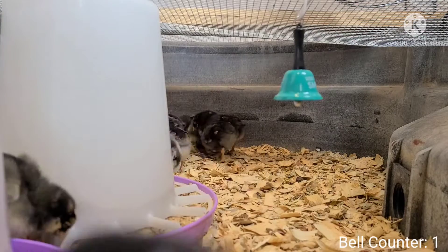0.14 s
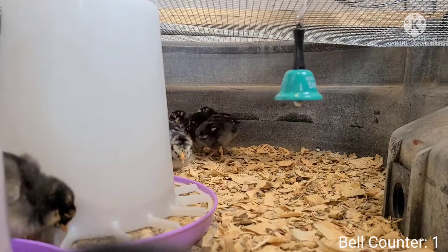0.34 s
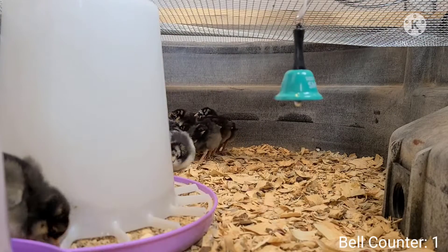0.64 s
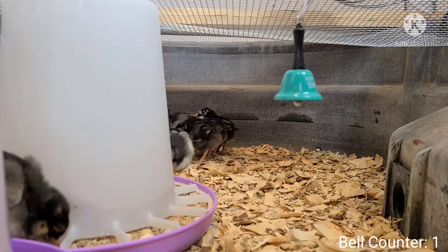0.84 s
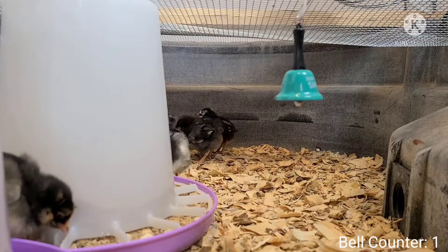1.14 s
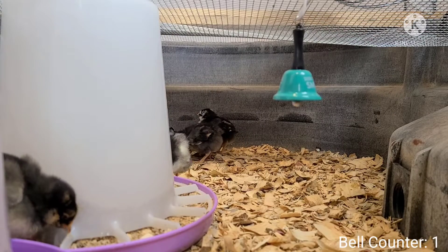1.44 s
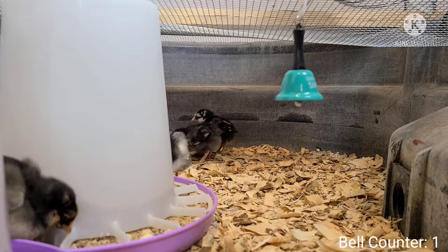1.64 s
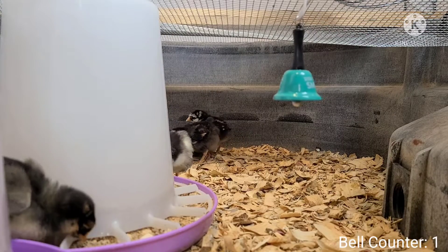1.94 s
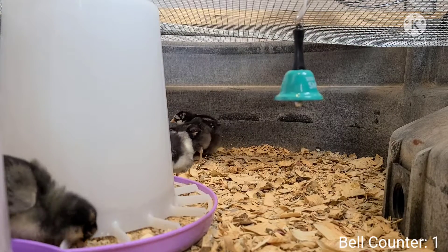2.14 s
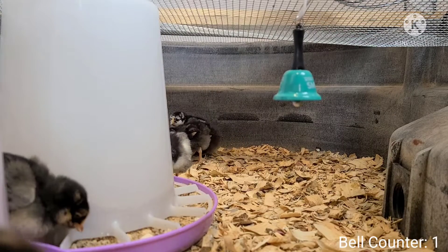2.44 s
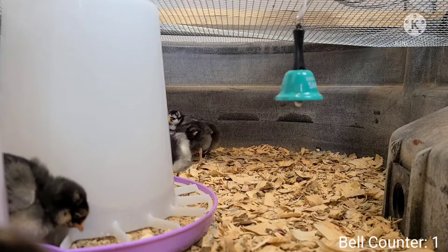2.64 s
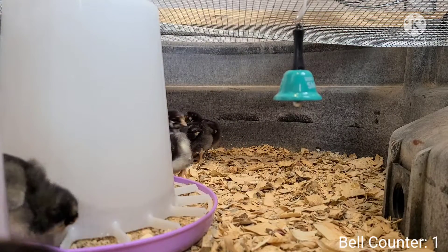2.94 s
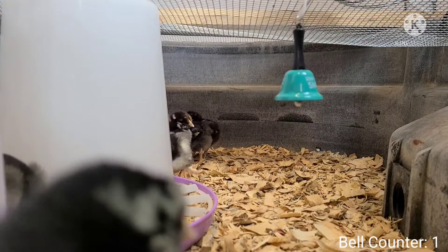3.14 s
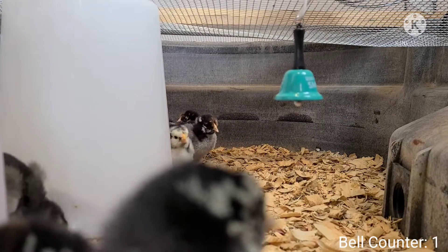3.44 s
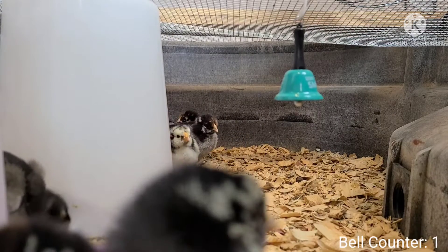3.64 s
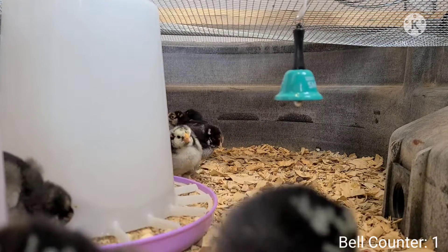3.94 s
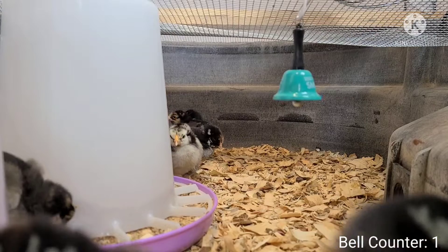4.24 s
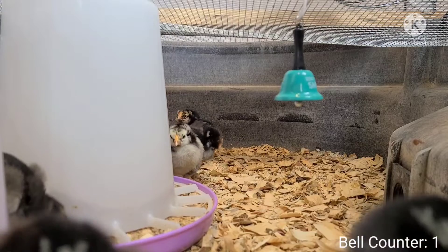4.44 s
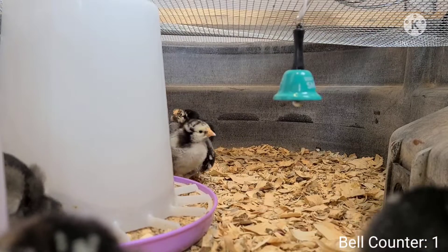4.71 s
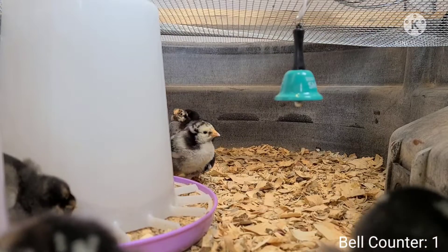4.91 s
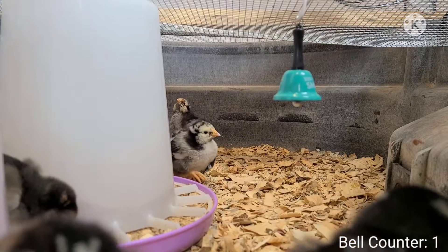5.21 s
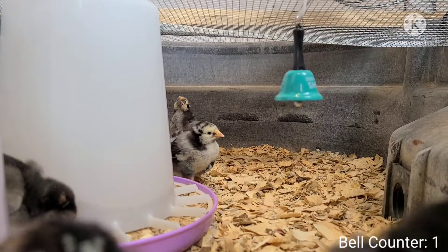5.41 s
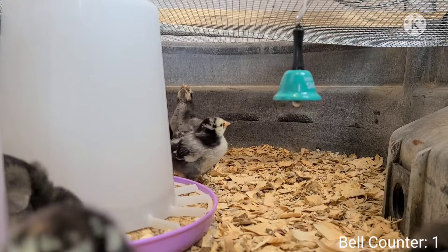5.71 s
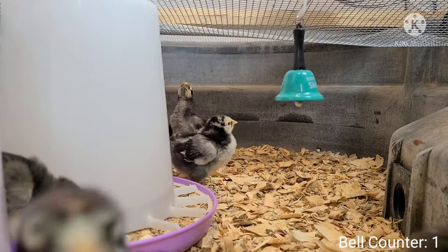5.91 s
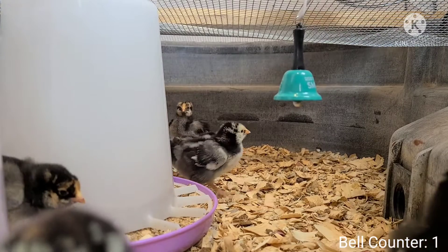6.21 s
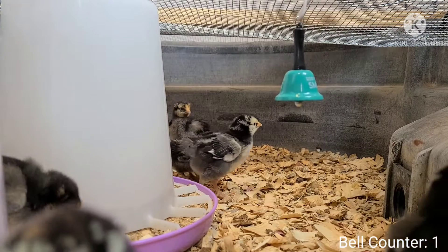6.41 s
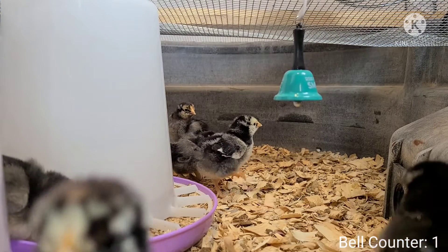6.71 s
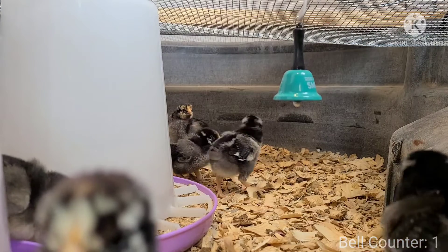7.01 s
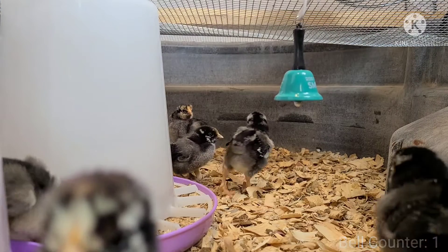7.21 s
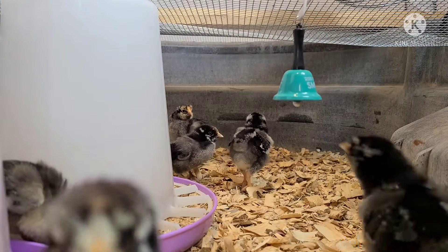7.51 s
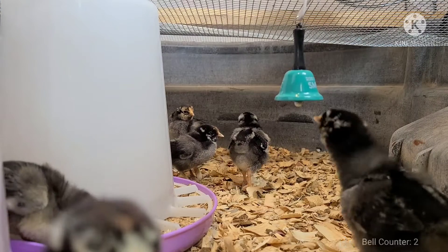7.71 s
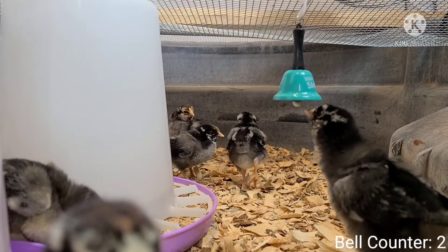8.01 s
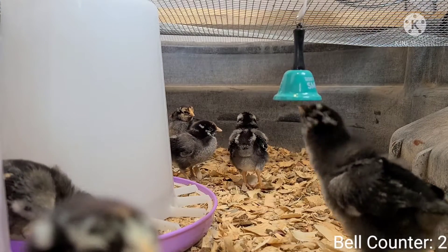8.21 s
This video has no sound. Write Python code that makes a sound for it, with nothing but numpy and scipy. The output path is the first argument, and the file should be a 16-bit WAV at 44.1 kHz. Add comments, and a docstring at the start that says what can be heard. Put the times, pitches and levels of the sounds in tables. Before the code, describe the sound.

Inside a small wooden brooder, close to the microphones, young chicks peep in short sliding whistles, thickest at first and then sparser. Their feet thump the hollow floor and scratch in wood shavings, with plasticky pecks at a feeder. It opens with a loud beak knock on the left. Late on, a heavy thumping scuffle showers crisp shavings, a smaller one follows, then lighter snaps lead to one short metallic bell strike. Quiet room air underneath.

```python
"""A beak pecks close to the left microphone while young chicks peep in a boxed brooder; whistled glides make the peeps.
Hops boom on the floor as struck modes, and filtered grains and short knocks make the shavings rustle and snap.
A trill swings through a throat resonance at 2.4 s, and nearer peeps follow from 4.9 s.
Two scuffles shower shavings about near 6 and 7 s; just before the end a chick rings a small hanging bell.
Dull reflections of the box surround the calls and knocks, and steady room air lies under everything."""
import sys
import numpy as np
from scipy import signal
from scipy.io import wavfile
from scipy.ndimage import uniform_filter1d

SR = 44100
rng = np.random.default_rng(int(sys.argv[2]) if len(sys.argv) > 2 else 0)


def to_wav(sig):
    """Store sig (one row per channel, or 1-D mono) as 16-bit WAV at the path in sys.argv[1].

    Samples outside -1..1 are clipped; the rate is SR.
    """
    pcm = np.clip(np.atleast_2d(sig), -1, 1) * 32767
    pcm = np.round(pcm).astype(np.int16)
    wavfile.write(sys.argv[1], SR, pcm.T)  # frames by channels


N = 368235

NEAR_DB, FAR_DB_PER_DB = -30, .62   # reference level of a near call [dB]; echo added per dB below it
LAG_S_PER_DB = .0001   # a sound louder on one side also arrives there first
OVERTONE_DB = -40
PEEP_ROUNDING, FLUTTER_PER_S = .25, 220   # share of the length that rounds the glide; speed of the wavering
PEEP_DB_PER_KHZ = -4   # within a peep the high part is fainter
# Near peeps swell more sharply: (level [dB], power of the arch)
FAR_SWELL = (-48, .6)
NEAR_SWELL = (-33, 1.2)
# Gliding calls: (time [s], length [s], start pitch [Hz], turn pitch [Hz], end pitch [Hz],
# turn [share of length], loudest point [share of length], nominal envelope level [dB], left-right [dB])
PEEP_CALLS = [(.028,.04,3200,4800,3000,.55,.6,-54,4),(.056,.03,4700,4400,3600,.5,.3,-54,3),(.056,.06,3100,2950,2880,.5,.4,-50,2),(.06,.045,3900,3500,3200,.5,.4,-53,2),(.159,.046,3150,3800,2700,.45,.6,-49,2),
              (.172,.016,4050,4240,4050,.4,.4,-63,1),(.458,.05,3700,4850,3900,.5,.5,-56,2),(.498,.038,3450,3250,3650,.4,.35,-54,2),
              (.548,.1,3250,3500,2900,.2,.4,-50,0),(.67,.04,3450,4050,2850,.45,.7,-51,-2),(.678,.016,4550,4620,4500,.5,.5,-60,1),
              (.74,.042,3600,3350,3000,.5,.5,-54,6),(.797,.038,3700,4400,2700,.5,.8,-50,2),(.835,.08,2900,3450,3050,.28,.4,-52,1),
              (1.013,.065,3800,4400,3000,.3,.55,-59,5),(1.17,.057,3350,3950,3000,.7,.6,-54,-2),(1.195,.02,4400,4800,4800,.6,.6,-60,1),
              (1.227,.078,3050,3700,4100,.3,.3,-59,0),(1.268,.016,3450,3390,3300,.5,.4,-54,1),(1.272,.026,4750,4900,4700,.4,.5,-62,5),
              (1.308,.02,2720,2680,2640,.5,.4,-56,-1),(1.405,.045,4500,3700,2600,.5,.8,-51,-1),(1.418,.04,3350,3150,2650,.5,.5,-55,-1),(2.826,.02,3300,2900,2650,.5,.6,-53,2),
              (1.994,.07,4000,4150,2650,.15,.5,-50,-1),(2.16,.068,4500,3550,3200,.5,.6,-53,5),(2.372,.065,3400,3550,3250,.3,.4,-50,3),
              (2.572,.04,3050,3100,2950,.3,.4,-55,2),(2.664,.05,3350,3700,2800,.5,.4,-49,1),(2.788,.04,3300,4350,2700,.55,.6,-54,2),
              (2.8,.018,4900,4900,4700,.4,.4,-60,1),(3.075,.055,3550,3450,2900,.3,.6,-47,1),
              (3.24,.04,4350,3900,3600,.4,.2,-60,4),(3.285,.025,3500,3300,3100,.5,.6,-50,4),(3.516,.042,3300,3200,2750,.4,.7,-56,4),
              (3.653,.055,3650,3330,2800,.45,.35,-51,6),(4.186,.074,2950,2720,2620,.35,.35,-52,6),(4.418,.055,3450,3400,3150,.4,.55,-57,5),
              (4.486,.044,3000,2780,2700,.5,.6,-56,4),(4.933,.058,3750,3230,2800,.5,.5,-31,-5),(5.489,.031,3700,3200,2800,.45,.45,-33,2),
              (5.657,.052,3800,3150,2860,.4,.6,-31,-8),(6.972,.052,3950,3200,2950,.6,.5,-29,2)]


def peeps():
    """Each syrinx whistle glides to a turn and on, its level wavering; returns the calls and their echo feed."""
    out, echoed = np.zeros((2, 2, N))
    wavers = rng.standard_normal((len(PEEP_CALLS), 2, 60))
    for call, waver in zip(PEEP_CALLS, wavers):
        s, length, start_hz, turn_hz, end_hz, turn, loudest, level_db, pan_db = call
        u = np.linspace(0, 1, round(length * SR))
        pitch = np.interp(u, [0, np.clip(turn, .05, .95), 1], [start_hz, turn_hz, end_hz])
        pitch = uniform_filter1d(pitch, size=round(PEEP_ROUNDING * len(u)) + 1, mode="nearest")
        wobble, flutter = (np.interp(u * length * FLUTTER_PER_S, np.arange(len(w)), w) for w in waver)
        # faint, far voices are more ragged in pitch and level
        pitch *= 1 + .0007 * (NEAR_DB - level_db) * wobble
        skew = np.log(.5) / np.log(np.clip(loudest, .15, .9))
        sharpness = np.interp(level_db, *np.transpose([FAR_SWELL, NEAR_SWELL]))
        swell = rms_one(np.sin(np.pi * u ** skew) ** sharpness)
        tilt_db = PEEP_DB_PER_KHZ * (pitch - pitch.mean()) / 1000
        flutter_db = .17 * (NEAR_DB + 4 - level_db) * flutter
        peep = whistle(pitch, swell * from_db(level_db + tilt_db + flutter_db))
        add(out, s, peep, pan_db)
        add(echoed, s, from_db(FAR_DB_PER_DB * (NEAR_DB - level_db)) * peep, 0)   # faint = far = wetter
    return out, echoed[0]


THROAT_HZ, THROAT_WIDTH_HZ, THROAT_DB = 3330, 250, 16
# Extent of the trill: (start [s], end [s], lowest pitch [Hz])
TRILL_EXTENT = (2.441, 2.572, 2500)
# Swings of the trill: (time of the top [s], top pitch [Hz], level before the throat lift [dB])
TRILL_SWINGS = [(2.43, 3000, -50), (2.4625, 3620, -45), (2.494, 4150, -48), (2.5265, 3680, -47),
                (2.556, 3400, -49), (2.586, 3300, -52)]


def trill():
    """A whistle swings up and down and gains level at the throat resonance; returns call and echo feed."""
    out, echoed = np.zeros((2, 2, N))
    start, end, low_hz = TRILL_EXTENT
    t = np.arange(start, end, 1 / SR)
    top_s, top_hz, top_db = np.transpose(TRILL_SWINGS)
    swing = np.interp(t, top_s, np.arange(len(top_s)))
    nearest_top_hz = top_hz[np.round(swing).astype(int)]
    pitch = low_hz + (nearest_top_hz - low_hz) * np.abs(np.cos(np.pi * swing)) ** 2.3
    lift_db = THROAT_DB * np.exp(-((pitch - THROAT_HZ) / THROAT_WIDTH_HZ) ** 2)
    fade = np.sin(np.linspace(0, np.pi, len(t))) ** .25
    call = whistle(pitch, from_db(np.interp(t, top_s, top_db) + lift_db) * fade)
    add(out, start, call, -.7)
    add(echoed, start, from_db(13.5) * call, 0)
    return out, echoed[0]


def whistle(hz, envelope):
    """A nearly pure tone with a faint octave."""
    phase = 2 * np.pi * np.cumsum(hz) / SR
    return envelope * (np.sin(phase) + from_db(OVERTONE_DB) * np.sin(2 * phase))


SHUFFLE_DB, SHUFFLE_T60_S, SHUFFLE_ATTACK_S = -10, .6, .012   # level under the thump; t60 before damping
# Modes far from the struck pitch ring less and later; a foot pushes softly
FOCUS_DB_PER_OCTAVE, PUSH_CYCLES, SCATTER_S = -5, .45, .02   # SCATTER_S is the delay per octave
# Above CROSS_HZ the floor also rings crosswise, opposed in the two microphones
CROSS_DB, CROSS_HZ, CROSS_LAG_S = -3, 400, .0016
# Low and upper modes of the box floor: (pitch [Hz], relative level [dB], free t60 [s])
BOOM_MODES = [(45, -18, .3), (82, 0, .45), (100, 1, .35), (124, -1, .3), (145, -3, .5)]
UPPER_MODES = [(230, 2, .35), (250, -2, .3), (280, -4, .25), (345, -6, .2), (393, -3, .22), (513, -7, .18),
               (610, -11, .15)]
# General bustle of the flock, nominal levels: (time [s], boom [dB], upper floor modes [dB],
# scuff [dB], crackle floor [dB], left-right of scuff and crackle [dB]); the shavings play it too
FLOCK_BUSTLE = [(0.0, -60, -59, -68, -78, 2.0), (1.81, -52, -55, -65, -76, -3.0),
                (2.39, -61, -63, -68, -78, 0.5), (2.84, -53, -57, -65, -74, 0.0),
                (3.9, -55, -61, -69, -77, -1.0), (4.49, -61, -61, -65, -75, 1.0),
                (4.91, -48, -52, -63, -76, -3.5), (5.77, -58, -58, -66, -76, -3.5),
                (6.02, -54, -54, -60, -71, -0.5), (6.16, -43, -56, -65, -74, -1.5),
                (6.33, -52, -62, -70, -79, -2.0), (6.72, -59, -60, -69, -81, -0.5),
                (7.14, -46, -53, -61, -78, -1.0), (7.49, -57, -63, -65, -74, 0.0),
                (8.19, -64, -66, -70, -77, -2.5), (8.35, -63, -67, -64, -73, 9.0)]
# Hops and landings, the first row being the heavily damped blow of the beak's peck: (time [s], nominal peak
# [dB], upper modes over the boom [dB], struck boom pitch [Hz], # struck upper pitch [Hz], damping [share of the
# free t60])
FLOOR_THUMPS = [(0.048, -36, -6, 130, 400, 0.12), (0.229, -44, -13, 64.6, 277, 0.6),
                (0.309, -52, 2, 94.2, 382, 0.6), (0.526, -45, -8, 83.4, 221, 0.6),
                (0.724, -47, -1, 61.9, 245, 0.6), (0.824, -46, -6, 91.5, 213, 0.6),
                (0.939, -47, -1, 70.0, 261, 0.6), (0.976, -37, -7, 75.4, 213, 0.6),
                (1.052, -33, -12, 105, 213, 0.6), (1.284, -41, -10, 78.1, 240, 0.6),
                (1.517, -27, -11, 132, 300, 0.6), (1.598, -33, -9, 116, 215, 0.6),
                (1.664, -40, 4, 96.9, 345, 0.6), (1.859, -44, -2, 105, 439, 0.6),
                (2.065, -43, -5, 129, 213, 0.6), (2.262, -43, -9, 78.1, 213, 0.6),
                (2.548, -47, -1, 121, 541, 0.6), (2.709, -46, -1, 91.5, 237, 0.6),
                (2.796, -34, -14, 94.2, 229, 0.6), (2.92, -30, -13, 105, 234, 0.6),
                (3.549, -37, -10, 80.7, 223, 0.6), (3.598, -45, 1, 132, 234, 0.6),
                (3.873, -43, -11, 102, 218, 0.6), (4.017, -43, -9, 99.6, 240, 0.6),
                (4.468, -49, 10, 143, 213, 0.6), (4.608, -48, 2, 102, 299, 0.6),
                (4.717, -38, -1, 143, 213, 0.6), (4.746, -24, -9, 108, 330, 0.6),
                (4.938, -43, 2, 135, 310, 0.6), (5.076, -34, -16, 96.9, 261, 0.6),
                (5.228, -44, 2, 80.7, 328, 0.6), (5.357, -37, -6, 83.4, 213, 0.6),
                (5.985, -20, -9, 94.2, 226, 0.6), (6.037, -20, -7, 88.8, 229, 0.6),
                (6.098, -27, 1, 140, 231, 0.6), (6.724, -44, -5, 105, 215, 0.6),
                (6.829, -44, -5, 124, 213, 0.6), (6.987, -33, -7, 105, 237, 0.6),
                (7.029, -30, -12, 86.1, 213, 0.6), (7.203, -35, -7, 91.5, 226, 0.6),
                (7.447, -42, -11, 78.1, 237, 0.6), (8.276, -49, -1, 67.3, 256, 0.6),
                (8.303, -54, 6, 100, 400, 0.5), (6.012, -34, 2, 120, 480, 0.5),
                (6.062, -30, 3, 120, 520, 0.6), (7.24, -44, 2, 100, 400, 0.5)]


def floor_boards():
    """Soft footfalls keep the floor modes going; thumps favour modes near their pitch and a shuffle follows."""
    boom_db, upper_db = in_time(FLOCK_BUSTLE)[:2]
    s, thump_db, over_db, boom_hz, upper_hz, damping = np.transpose(FLOOR_THUMPS)
    out, click = 0, np.eye(1, SR // 2)[0]
    groups = ((BOOM_MODES, boom_db, thump_db - .7, boom_hz),
              (UPPER_MODES, upper_db, thump_db + over_db + 1.5, upper_hz))
    for modes, bustle_db, hit_db, hit_hz in groups:
        steps = grains(per_s=150, spread_db=4)
        # standing feet halve the free ringing time
        patter = sum(from_db(db) * ring(steps[k % 2], hz, .5 * t60) for k, (hz, db, t60) in enumerate(modes))
        shuffle = bursts(bustle_db, s, hit_db + SHUFFLE_DB, SHUFFLE_T60_S * damping, SHUFFLE_ATTACK_S)
        out = out + shuffle * rms_one(patter)
        detunings = rng.normal(1, .02, (len(s), len(modes)))
        for at, level_db, struck_hz, share, detune in zip(s, hit_db, hit_hz, damping, detunings):
            push = np.hanning(round(PUSH_CYCLES * SR / struck_hz))[::4]
            push = push / push.sum()
            for (hz, db, t60), off in zip(modes, detune):
                octaves = abs(np.log2(hz / struck_hz))
                ringing = ring(click, hz * off, max(share, .1) * t60)
                blow = np.convolve(ringing[::4], push).repeat(4)   # coarse steps, smoothed by the filter below
                i = round((at + SCATTER_S * octaves) * SR)
                gain = from_db(level_db + db + FOCUS_DB_PER_OCTAVE * octaves)
                out[i:i + len(blow)] += gain * blow[:N - i]
    out = filtered(out, 3, [50, 1500], "band")
    cross = from_db(CROSS_DB) * np.roll(filtered(out, 4, CROSS_HZ, "high"), round(CROSS_LAG_S * SR))
    later = np.roll(out, round(.00025 * SR))   # the right side hears it later
    return np.stack([from_db(-.4) * out + cross, from_db(.4) * later - cross])


FEEDER_RUB_DB = -4   # how much of the scuff rings in the feeder
TRICKLE_DB, TRICKLE_PER_S = 3.5, 9   # the crackle swells at random over its floor
CRACKLE_LEVEL_HZ = 5000   # crackle levels count the treble above this
# The harder the kick, the faster it starts: (crackle level [dB], attack [s])
HARD_KICK = (-35, .004)
SOFT_KICK = (-60, .014)
# The higher the crackle, the sooner it dies: (upper edge [Hz], length [share of the kick's t60])
CRACKLE_FADES = [(4500, 1.15), (9500, .95), (20000, .72)]
# Spectra of dry shavings and of duller feet: (frequency [Hz], relative density [dB per Hz])
CRACKLE_SPECTRUM = [(880, -36), (1500, -6), (2020, -1), (2300, -6), (3730, -5), (5280, -9), (8740, -5),
                    (12200, -12), (15400, -15), (16000, -47)]
SCUFF_SPECTRUM = [(250, -16), (500, -2), (900, -2), (1400, 1), (2000, -3), (3000, -10), (5000, -30)]
# Modes of the plastic feeder, also knocked and scraped below: (pitch [Hz], relative level [dB], base t60 [s])
FEEDER_MODES = [(620, -4, .02), (1035, 0, .025), (1340, 2, .03), (1560, 0, .025), (1810, -2, .02),
                (2300, -3, .012)]
# Kicks in the shavings, nominal levels: (time [s], dull scuff [dB], bright crackle [dB], base t60 [s],
# left-right [dB])
SHAVING_KICKS = [(.38, -55, -66, .25, -1), (.745, -55, -64, .5, -1), (1.19, -58, -64, .3, 2),
                 (1.36, -54, -75, .3, -2), (1.89, -56, -72, .2, -2), (2.11, -57, -72, .25, -1),
                 (2.38, -56, -64, .4, 1), (2.543, -49, -66, .25, 0), (2.935, -58, -66, .2, 2),
                 (2.99, -58, -66, .3, 0), (3.2, -57, -66, .5, 0), (3.29, -52, -60, .4, 1),
                 (3.8, -58, -64, .25, -3), (4.05, -60, -66, .3, 0), (4.09, -50, -55, .2, -4),
                 (4.33, -58, -66, .3, -1), (4.545, -56, -66, .3, 0), (4.6, -54, -72, .2, -1),
                 (4.73, -44, -66, .3, -3), (4.84, -60, -68, .4, -2), (4.925, -45, -64, .25, -5),
                 (5.075, -57, -72, .2, -3), (5.217, -48, -59, .3, -4), (5.455, -53, -70, .25, 1),
                 (5.74, -52, -63, .5, -4), (5.998, -39, -70, .25, 1), (6.043, -31, -25, .29, 1),
                 (6.205, -46, -54, .1, -1), (6.55, -58, -68, .3, 0), (6.83, -54, -64, .35, -2),
                 (6.94, -50, -62, .2, 1), (6.966, -45, -34, .24, 2), (7.025, -45, -50, .3, -1),
                 (7.07, -48, -60, .25, -1), (7.19, -53, -75, .3, -2), (7.29, -58, -62, .5, -1),
                 (7.48, -58, -68, .25, 0), (7.6, -58, -63, .5, 0), (7.665, -54, -59, .2, 2),
                 (7.83, -55, -63, .3, 1), (8.15, -55, -63, .15, -4), (8.235, -54, -66, .2, -1),
                 (8.295, -56, -62, .2, -2)]


def shavings():
    """Dry grains in handfuls: a bright crackle and a duller scuff of feet that also rubs the feeder."""
    scuff_db, crackle_db, pan_db = in_time(FLOCK_BUSTLE)[2:]
    trickle = np.abs(wander(TRICKLE_PER_S))
    crackle_db = crackle_db + TRICKLE_DB * trickle
    s, kick_scuff_db, kick_crackle_db, t60, kick_pan_db = np.transpose(SHAVING_KICKS)
    attack_s = np.interp(kick_crackle_db, *np.transpose([SOFT_KICK, HARD_KICK]))

    def kicked(floor_db, kick_db, share):
        """Left and right gain of one layer, the kicks standing out of the bustle."""
        return np.stack([bursts(floor_db + side * pan_db, s, kick_db + side * kick_pan_db,
                                share * t60, attack_s) for side in (.5, -.5)])

    dull = kicked(scuff_db, kick_scuff_db, 1)
    bright = [kicked(crackle_db, kick_crackle_db, share) for hz, share in CRACKLE_FADES]

    crackle = colour(grains(7000, 3.5), [(700, -90)] + CRACKLE_SPECTRUM, patchy_db=2.2)
    crackle = crackle / filtered(crackle, 4, CRACKLE_LEVEL_HZ, "high").std()
    below = [0]
    for hz, share in CRACKLE_FADES:
        below.append(signal.sosfiltfilt(signal.butter(2, hz, fs=SR, output="sos"), crackle))
    crackle = sum(gain * (upper - lower) for gain, lower, upper in zip(bright, below, below[1:]))

    rubs = grains(900, 4)
    rubbed = rms_one(sum(from_db(db) * ring(rubs, hz, 1.6 * t60) for hz, db, t60 in FEEDER_MODES))
    feet = colour(grains(2500, 3.5), [(120, -90)] + SCUFF_SPECTRUM + [(8000, -90)], patchy_db=4)
    scuff = dull * (feet + from_db(FEEDER_RUB_DB) * rubbed)
    # a heavy shower is smoother than a trickle
    lumpy_db = np.interp(bright[1].mean(axis=0), from_db([-62, -45]), [3, 1.1])
    return (crackle + scuff) * clumps(per_s=80, depth_db=lumpy_db)


# Fainter snaps fall at random: how many, and their average levels and spread
FAINT_SNAPS, FAINT_KNOCK_DB, FAINT_TICK_DB, FAINT_SPREAD_DB = 36, -56, -59, 4
# Snaps of shavings and pecks at the feeder: (time [s], knock peak [dB], tick level before its filter [dB],
# left-right [dB])
FEEDER_SNAPS = [(.7467, -42, -50, -8), (.8256, -43, -53, -11), (.8515, -44, -51, -10), (.9238, -46, -54, 0),
                (1.1957, -42, -50, 4), (1.2251, -35, -51, 5), (2.2922, -50, -51, -1), (2.4159, -46, -44, 0),
                (2.4334, -31, -51, 1), (2.5841, -44, -47, -4), (2.6339, -60, -47, 3), (2.9383, -34, -51, 3),
                (3.0251, -45, -56, 3), (3.2291, -41, -53, 0), (3.3648, -49, -46, 4), (3.8227, -41, -49, 0),
                (3.9574, -47, -66, -7), (4.1036, -40, -40, 1), (4.3555, -45, -58, 0), (4.3855, -51, -49, 2),
                (4.6304, -44, -66, 2), (4.7616, -36, -63, -6), (4.9651, -43, -41, -1),
                (5.1457, -36, -61, -9), (5.2575, -45, -49, -2), (5.3652, -57, -49, -6),
                (5.8726, -41, -55, -5), (6.0552, -23, -14, 3), (6.2088, -34, -43, 2),
                (6.2507, -47, -49, -1), (7.3063, -45, -45, -1), (7.337, -38, -54, 0),
                (7.5872, -51, -46, -4), (7.6735, -36, -41, 5), (7.7543, -46, -52, -5),
                (7.8356, -45, -63, 5), (7.8501, -39, -51, 1), (7.876, -41, -38, 2), (8.1604, -42, -53, -4),
                (8.1888, -48, -48, -2), (8.2437, -43, -62, -3), (8.263, -46, -52, -2), (6.303, -60, -52, 0),
                (7.243, -55, -57, 0), (5.645, -58, -55, 0),
                (1.364,-48,-60,-3),(2.247,-54,-54,0),(2.548,-43,-58,-4),(2.564,-39,-47,-1),(3.284,-43,-53,-2),
                (3.314,-44,-50,-1),(4.617,-41,-62,0),(4.744,-43,-57,-4),(4.939,-37,-46,-1),(5.217,-48,-48,-3),(5.227,-39,-50,-3),
                (5.235,-36,-48,-2),(5.467,-41,-56,-2),(5.743,-42,-55,-4),(5.847,-45,-55,-7),(6.004,-30,-55,0),(6.561,-46,-57,-1),
                (6.913,-45,-63,4),(7.194,-43,-65,-1),(7.287,-46,-52,-3),(7.727,-44,-53,-3)]


def snaps():
    """Each snap is a bright tick and a knock that rings the feeder, with new mode strengths every time."""
    out, t = np.zeros((2, N)), np.arange(round(.05 * SR)) / SR
    faint = rng.standard_normal((FAINT_SNAPS, 3)) * FAINT_SPREAD_DB + [FAINT_KNOCK_DB, FAINT_TICK_DB, 0]
    faint_s = rng.uniform(0, N / SR, len(faint))
    rows = FEEDER_SNAPS + [(s, *row) for s, row in zip(faint_s, faint)]
    noises = rng.standard_normal((len(rows), len(t)))
    strengths = rng.normal(0, 4, (len(rows), len(FEEDER_MODES)))
    for (s, knock_db, tick_db, pan_db), noise, strength_db in zip(rows, noises, strengths):
        contact = noise * np.exp(-t / .002)
        knock = sum(from_db(db + more_db) * ring(contact, hz, t60)
                    for (hz, db, t60), more_db in zip(FEEDER_MODES, strength_db))
        knock = from_db(knock_db) * knock / np.abs(knock).max()
        tick = from_db(tick_db) * filtered(noise * np.exp(-t / .0018), 1, [3200, 13000], "band")
        add(out, s, knock + tick, pan_db, lag_s_per_db=2e-5)
    return out


# A claw dragged over the feeder: (start [s], end [s], level [dB])
CLAW_SCRAPE = (.382, .445, -50)


def scrape():
    """Dense random slips of a claw ring the second and third feeder modes."""
    start, end, level_db = CLAW_SCRAPE
    slips = rng.standard_normal(round((end - start) * SR))
    slips = slips * np.sin(np.linspace(0, np.pi, len(slips))) ** .4
    rung = rms_one(sum(ring(slips, hz, 2 * t60) for hz, db, t60 in FEEDER_MODES[1:3]))
    out = np.zeros((2, N))
    add(out, start, from_db(level_db) * rung, -1.5)
    return out


PECK_PAN_DB = 10   # close to the left
# Microphone housing: (thud pitch [Hz], click pitch [Hz])
HOUSING_HZ = (550, 3000)
# Pecks at the microphone: (time [s], thud [dB], click [dB])
MICROPHONE_PECKS = [(.0488, -13, -19), (.0544, -30, -15)]


def pecks():
    """A beak on the housing: one pulse sets off a thud and a click that ring for a couple of cycles."""
    out = np.zeros((2, N))
    pulse = uniform_filter1d(np.eye(1, 900, 4)[0], size=4)
    for s, *levels_db in MICROPHONE_PECKS:
        peck = sum(from_db(db) * ring(pulse, hz, 4.5 / hz) for db, hz in zip(levels_db, HOUSING_HZ))
        add(out, s, peck, PECK_PAN_DB)
    return out


BELL_S, CLAPPER_DB = 8.2915, -31   # strike time; level of the tick before its filter
CLAPPER_DECAY_S, CLAPPER_BAND_HZ = .0022, [2200, 9500]
# Bell modes; close pairs beat: (pitch [Hz], level [dB], t60 [s], left-right [dB])
BELL_MODES = [(2557, -29, .3, 8), (2530, -46, .3, 4), (8300, -25, .25, -11), (8250, -28, .2, -11),
              (12220, -54, .07, 0)]


def bell():
    """The clapper ticks and sets modes ringing, each radiating to its own side."""
    out, click = np.zeros((2, N)), np.eye(1, SR // 5)[0]
    for k, (hz, level_db, t60, pan_db) in enumerate(BELL_MODES):
        mode = (-1) ** k * from_db(level_db) * ring(click, hz, t60)   # a pair starts opposed and swells
        add(out, BELL_S, mode, pan_db, lag_s_per_db=5e-6)
    t = np.arange(SR // 20) / SR
    tick = rng.standard_normal(len(t)) * np.exp(-t / CLAPPER_DECAY_S)
    add(out, BELL_S, from_db(CLAPPER_DB) * filtered(tick, 2, CLAPPER_BAND_HZ, "band"), 1.5)
    return out


BOX_T60_S, WALL_CUT_HZ, BOX_DB = .105, 6000, -21


def box(x):
    """A dense swarm of dull reflections that dies away, another one for each side."""
    t = np.arange(SR // 4) / SR
    dull = np.exp(-2 * np.pi * WALL_CUT_HZ / SR)
    swarm = signal.lfilter([1], [1, -dull], rng.standard_normal((2, len(t))))
    swarm *= (1 - np.exp(-t / .004)) * from_db(-60 * t / BOX_T60_S)
    swarm /= np.sqrt(np.sum(swarm ** 2, axis=1, keepdims=True))
    return signal.fftconvolve(x[None], swarm, axes=1)[:, :N]


AIR_DB = -56
# Spectrum of the room air: (frequency [Hz], relative density [dB per Hz])
AIR_SPECTRUM = [(15, -35), (25, -5), (70, 1), (161, -12), (236, -8), (317, -14), (887, -25), (1330, -23),
                (2350, -30), (3250, -28), (7310, -47), (8830, -41), (14800, -46), (16000, -58)]


def room_air():
    """Steady coloured noise of the room."""
    return from_db(AIR_DB) * colour(rng.standard_normal((2, N)), AIR_SPECTRUM)


# Likeness of the two microphones: (frequency [Hz], left-right correlation)
STEREO_LIKENESS = [(60, 0.92), (180, 0.96), (550, 0.37), (1650, -0.03), (4970, -0.13), (15000, -0.02)]


def colour(pair, spectrum, patchy_db=0):
    """Half-octave bands give two unrelated signals a spectrum, patches and stereo likeness; rms 1."""
    out, edges = 0, 25 * 2 ** np.arange(0, 9.6, .5)
    for k, (low, high) in enumerate(zip(edges, edges[1:])):
        hz = np.sqrt(low * high)
        if at_hz(spectrum, hz) > -70:
            mid, side = filtered(pair, 2, [low, high], "band")
            alike = np.clip(at_hz(STEREO_LIKENESS, hz), -1, 1)
            # alternate signs join neighbours without a notch
            gain = (-1) ** k * from_db(at_hz(spectrum, hz)) * clumps(per_s=30, depth_db=patchy_db)
            out = out + gain * (np.sqrt(1 + alike) * mid + np.sqrt(1 - alike) * side * [[1], [-1]])
    return rms_one(out)


def grains(per_s, spread_db):
    """Random clicks of uneven size, other ones in each channel; rms 1."""
    sizes = from_db(spread_db * np.minimum(rng.exponential(1, (2, N)), 5)) * rng.choice([-1, 1], (2, N))
    return rms_one(sizes * (rng.random((2, N)) < per_s / SR))


def wander(per_s):
    """A random curve with per_s new values a second, joined by straight lines."""
    knots = rng.standard_normal(N // 100)   # more than enough
    return np.interp(np.arange(N) / SR * per_s, np.arange(len(knots)), knots)


def clumps(per_s, depth_db):
    """A gain that wanders fast, so that grains fall in handfuls."""
    return from_db(depth_db * wander(per_s) - .08 * depth_db ** 2)


HOLD_SHARE = .13   # a burst holds for this share of its t60 before it dies


def bursts(floor_db, times, levels_db, t60s, attacks_s):
    """A gain that rises at each time, holds and dies away, added in power to a floor."""
    power = from_db(2 * floor_db)
    for s, level_db, t60, attack_s in np.broadcast(times, levels_db, np.maximum(t60s, .03), attacks_s):
        i, t = round(s * SR), np.arange(round(1.5 * t60 * SR)) / SR
        decay = from_db(level_db - 60 * np.maximum(t / t60 - HOLD_SHARE, 0))
        burst = (1 - np.exp(-t / attack_s)) * decay
        power[i:i + len(t)] += burst[:N - i] ** 2
    return np.sqrt(power)


def ring(clicks, hz, t60):
    """A two-pole resonator: a unit click sets a sine of height 1 ringing."""
    r, w = from_db(-60 / (t60 * SR)), 2 * np.pi * hz / SR
    return signal.lfilter([0, np.sin(w)], [1, -2 * r * np.cos(w), r * r], clicks + 1e-18)


def add(out, s, sound, pan_db, lag_s_per_db=LAG_S_PER_DB):
    """Mixes a short sound in at time s, louder and earlier on its own side."""
    for channel, side in enumerate((1, -1)):
        i = max(round((s - side * pan_db * lag_s_per_db / 2) * SR), 0)
        out[channel, i:i + len(sound)] += from_db(side * pan_db / 2) * sound[:N - i]


def filtered(x, order, hz, kind):
    """A Butterworth filter."""
    return signal.sosfilt(signal.butter(order, hz, kind, fs=SR, output="sos"), x)


def from_db(db):
    """Gain of a level in dB."""
    return 10 ** (np.asarray(db) / 20)


def rms_one(x):
    """Scaled to unit rms."""
    return x / np.sqrt(np.mean(x ** 2) + 1e-20)


def in_time(rows):
    """Columns of a curve table, one value a sample."""
    s, *columns = np.transpose(rows)
    return [np.interp(np.arange(N) / SR, s, c) for c in columns]


def at_hz(points, hz):
    """A spectrum table read on a log-frequency axis."""
    table_hz, values = np.transpose(points)
    return np.interp(np.log(hz), np.log(table_hz), values)


def scene():
    """Everything in the box, over the steady air of the room."""
    peep_calls, peep_echo = peeps()
    trill_call, trill_echo = trill()
    knocks = snaps() + scrape() + bell() + pecks()
    reflections = from_db(BOX_DB) * box(peep_echo + trill_echo + knocks.mean(axis=0))
    return peep_calls + trill_call + knocks + reflections + floor_boards() + shavings() + room_air()


STOP_HZ = 16300   # from here up the treble is 60 dB down


def record(dry):
    """A steep low-pass cuts the top."""
    return signal.sosfilt(signal.cheby2(14, 60, STOP_HZ, fs=SR, output="sos"), dry)


dry = scene()
out = record(dry)
to_wav(out)
```